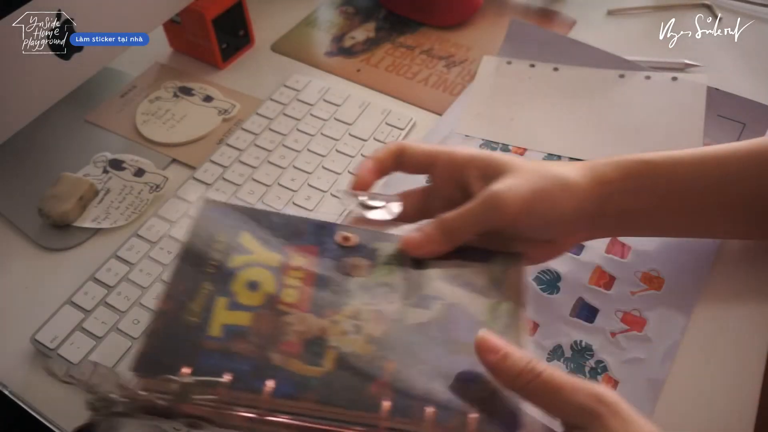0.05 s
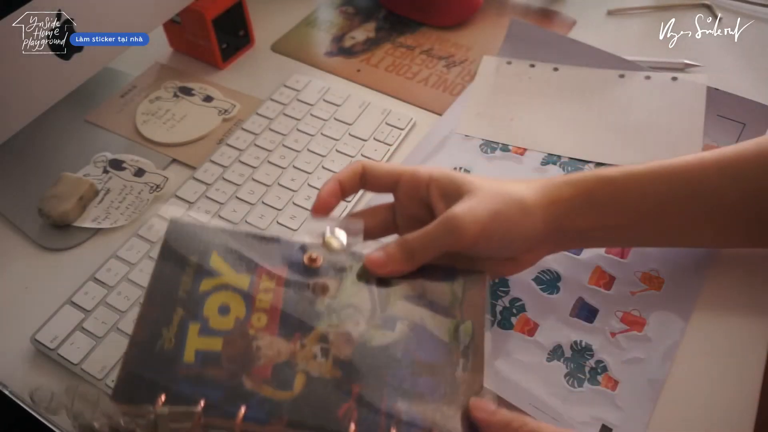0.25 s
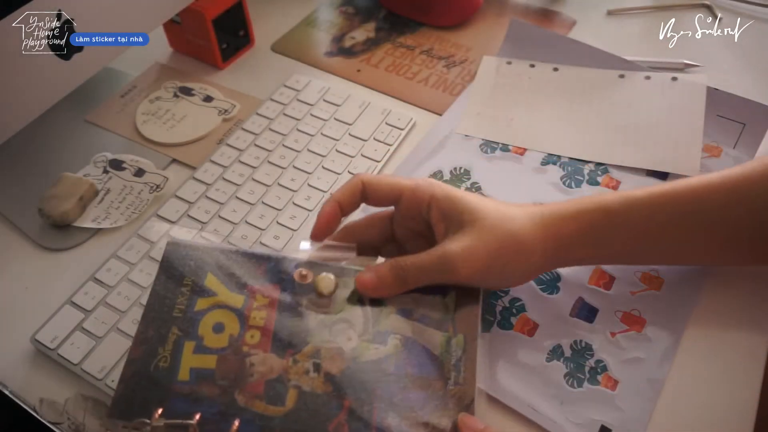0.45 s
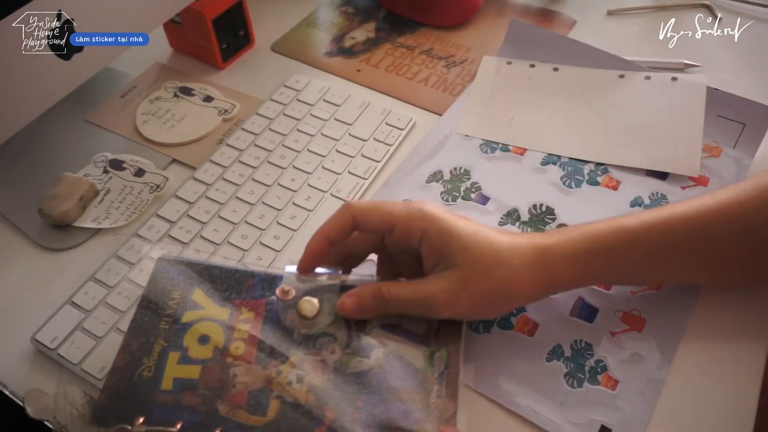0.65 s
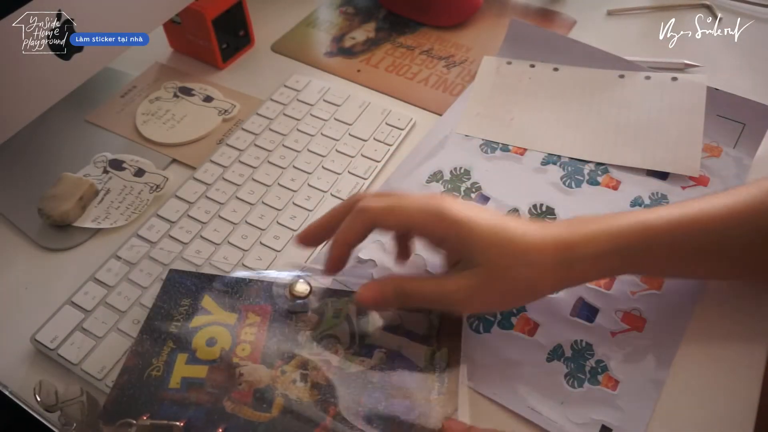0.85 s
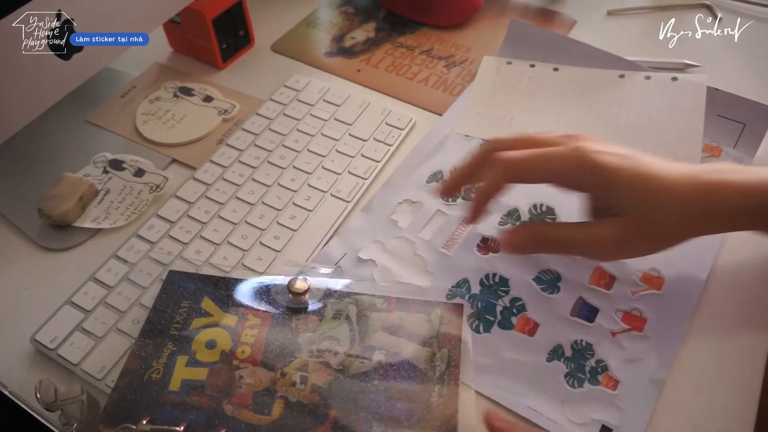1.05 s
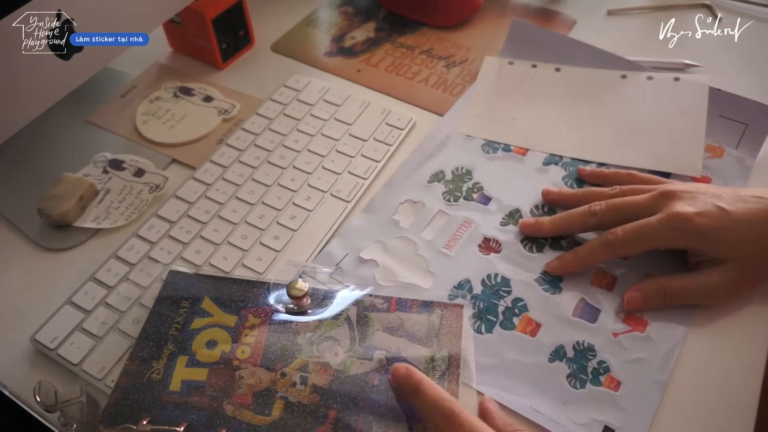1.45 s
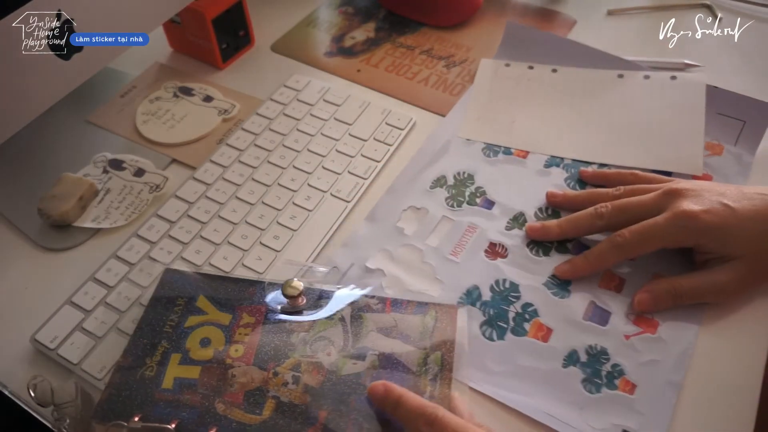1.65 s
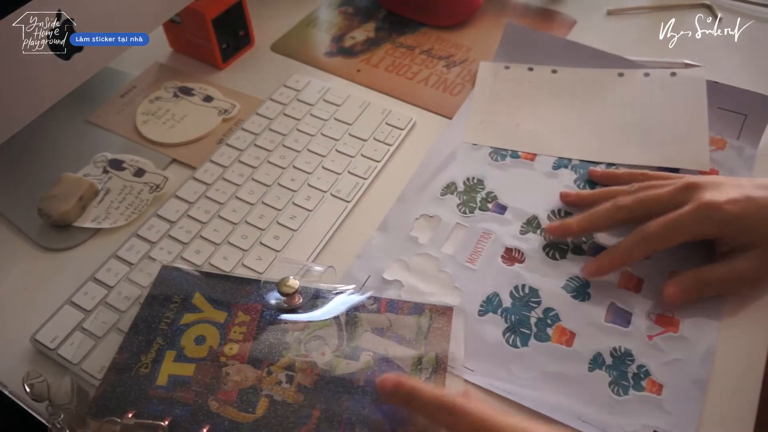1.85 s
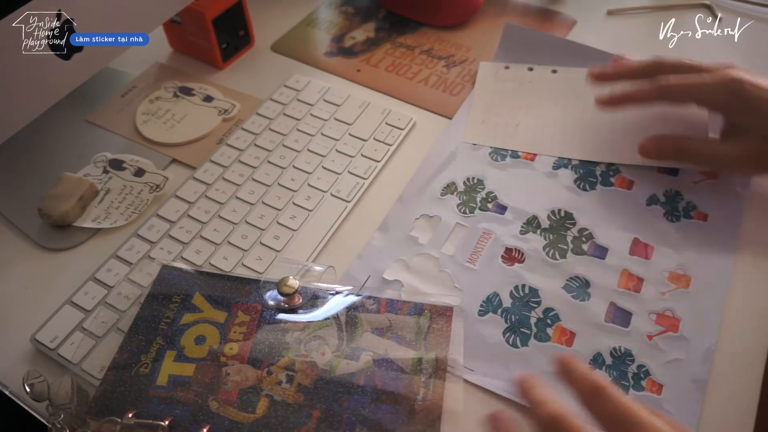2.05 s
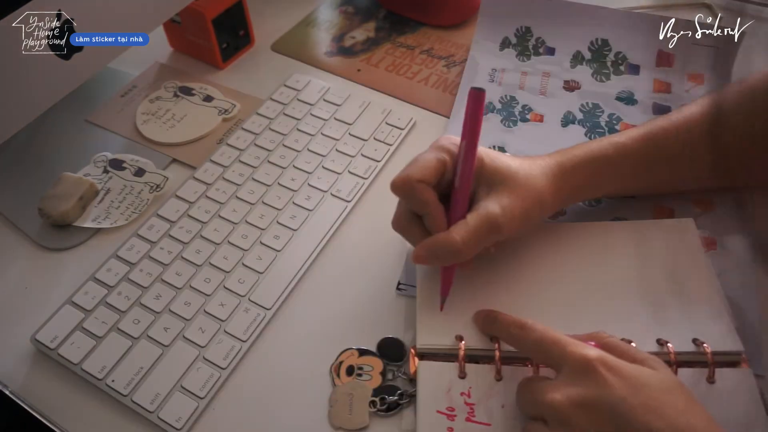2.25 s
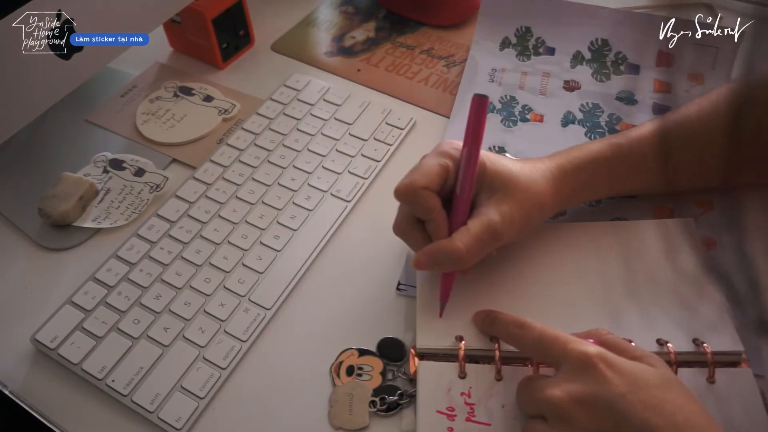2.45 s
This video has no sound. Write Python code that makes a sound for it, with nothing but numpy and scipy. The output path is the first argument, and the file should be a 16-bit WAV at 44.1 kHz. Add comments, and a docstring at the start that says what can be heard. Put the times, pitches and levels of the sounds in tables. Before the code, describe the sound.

A stiff plastic pouch crackles and snaps onto a desk, then hands brush over paper.

```python
"""Over the steady noise of a small, bright room, a stiff plastic pouch is laid on a desk.
Its edge knocks down, its flap snaps, and the buckling film crackles, with faint thuds from the desk.
Near 0.8 s fingers let go of the metal stud with two clicks; the pouch skids and settles.
Then fingertips wipe a glossy sticker sheet, a few faint ticks sound, and a palm glides over paper,
ending in one brighter brush at about 2.2 s."""
import sys
import numpy as np
from scipy import signal
from scipy.fft import rfft, irfft, next_fast_len
from scipy.io import wavfile

SR = 44100
rng = np.random.default_rng(int(sys.argv[2]) if len(sys.argv) > 2 else 0)


def unload_audio(sound):
    """Save the sound as a 16-bit wav file, at the path given as the first command line argument."""
    columns = np.transpose(np.atleast_2d(sound))
    # keep every value between -1 and 1, then stretch to whole-number steps
    steps = np.round(np.clip(columns, -1, 1) * 32767)
    wavfile.write(sys.argv[1], SR, steps.astype(np.int16))


N = 110250

# fine, bright crackle of the film (frequency [Hz], level [dB])
CRACKLE_SPECTRUM = [(300, -38), (1500, -13), (4000, -26), (6000, -11), (7700, 0), (9000, -4.5), (11000, -5)]
FINGER_PAN_DB = -5  # every pan is left minus right


def amp(db):
    """Decibels to gain."""
    return 10 ** (np.asarray(db) / 20)


def unit(x):
    """Scale to rms 1."""
    return x / np.sqrt(np.mean(x ** 2) + 1e-20)


def along(points, hz):
    """Read a curve of (frequency [Hz], value) points on a log frequency axis."""
    freqs, values = np.transpose(points)
    return np.interp(np.log(hz + 1), np.log(freqs + 1), values)


def pan(db):
    """Left and right gains for a level difference."""
    return amp(np.array([[.5], [-.5]]) * db)


def filtered(x, response):
    """Shape x with a frequency response."""
    n = x.shape[-1]
    size = next_fast_len(n + 4096)
    return irfft(rfft(x, size) * response(np.fft.rfftfreq(size, 1 / SR)), size)[..., :n]


def stereo(pair, spectrum=((1, 0), (2, 0))):
    """Colour and blend two unrelated noises: narrow in the bass, wide in the treble."""
    # stereo image (frequency [Hz], left-right correlation)
    likeness = [(60, 0.92), (500, 0.91), (1200, 0.74), (2500, 0.12), (10000, 0.1)]

    def response(hz):
        angle = np.arccos(along(likeness, hz)) / 2
        return amp(along(spectrum, hz)) * [np.cos(angle), np.sin(angle)]
    mid, side = filtered(pair, response)
    return unit(np.array([mid + side, mid - side]))


def add(out, start, x):
    """Mix x in at start seconds."""
    i = max(0, round(start * SR))
    out[:, i:i + x.shape[1]] += x[:, :N - i]


def swell(start, rise, hold, fall, db):
    """Envelope of one stroke: it climbs 21 dB over rise, holds, and drops 21 dB per fall."""
    t = np.arange(N) / SR - start
    below_peak = np.maximum(0, 1 - t / rise) + np.maximum(0, (t - rise - hold) / fall)
    return amp(db - 21 * below_peak)


def room_response():
    """The walls' answer to a click: a short tail that dies fastest in the high treble."""
    # reverb time (frequency [Hz], t60 [s])
    decay = [(150, 0.16), (800, 0.38), (2500, 0.33), (5000, 0.3), (11000, 0.084)]
    hz, t, bands = signal.stft(stereo(rng.standard_normal((2, SR // 2))), SR, nperseg=256)
    tail = signal.istft(bands * amp(-60 * t / along(decay, hz)[:, None]), SR, nperseg=256)[1]
    predelay = round(.008 * SR)
    return np.pad(tail / np.linalg.norm(tail[0]), ((0, 0), (predelay, 0)))


def friction(strokes, spectrum, slips_per_s, slip_db, pan_db=FINGER_PAN_DB):
    """Hiss and tiny random slips, swelling with each stroke."""
    envelope = sum(swell(*stroke) for stroke in strokes)
    slips = unit((rng.random(N) < slips_per_s / SR) * rng.standard_normal((2, N)))
    texture = rng.standard_normal((2, N)) + amp(slip_db) * slips
    return pan(pan_db) * envelope * stereo(texture, spectrum)


def impacts(contacts, modes, spectrum, crack_db, crack_t60, wet_db, low_cut_hz):
    """Each contact rings damped modes with a short crack; a soft contact is duller."""
    # added pan that leans the treble to the right (frequency [Hz], pan [dB])
    lean = [(200, -1.5), (630, 0), (1150, -2.5), (2000, -6), (3600, -5.5), (7000, -9)]
    out, t = np.zeros((2, N)), np.arange(SR // 10) / SR
    attack = 1 - np.exp(-t / 0.00013)
    for start, db, bright_hz, pitch, pan_db, sustain in contacts:
        ring = np.zeros_like(t)
        for k, (hz, mode_db, t60) in enumerate(modes):
            decay = amp(mode_db + rng.normal(0, 2.53) - 60 * t / (t60 * sustain))
            ring += (-1) ** k * decay * np.sin(2 * np.pi * hz * pitch * t)
        crack = amp(crack_db - 60 * t / crack_t60) * stereo(rng.standard_normal((2, len(t))), spectrum)
        softness = signal.butter(2, bright_hz, fs=SR)
        hit = amp(db) / 2 * signal.lfilter(*softness, (ring + crack) * attack)
        reverb = signal.fftconvolve(hit, room_response(), axes=1)
        add(out, start, pan(pan_db) * hit)
        add(out, start, pan(pan_db / 2) * amp(wet_db) * reverb)
    # the hits carry almost no bass
    out = signal.lfilter(*signal.butter(2, low_cut_hz, 'high', fs=SR), out)
    return filtered(out, lambda hz: pan(along(lean, hz)))


def room_tone():
    """Steady room noise with the faint, unsteady hum of an appliance."""
    # colour of the air (frequency [Hz], level [dB])
    spectrum = [(25, -32), (60, -34), (110, -23.5), (200, -19.5), (270, -16), (330, -11), (470, -8),
                (700, -4.5), (1250, 0), (1900, -2), (2850, -8.5), (3700, -18.5), (8000, -20),
                (11000, -30.5)]
    # its treble sits to the right (frequency [Hz], pan [dB])
    lean = [(100, 0.5), (450, -0.5), (1200, -3), (3000, -5.5), (9000, -8)]
    air = filtered(stereo(rng.standard_normal((2, N)), spectrum), lambda hz: pan(along(lean, hz)))
    drift = np.cumsum(rng.normal(0, 0.024, N))
    hum = np.sin(2 * np.pi * 414 * np.arange(N) / SR + drift)
    return amp(-51.5) * air + amp(-69) * hum


def palm_glides():
    """A palm glides over the sheets with a dull hush."""
    # slow hand moves (time [s], rise [s], hold [s], fall [s], level [dB])
    glides = [(-.02, 0.0097, 0.011, 0.28, -49.5), (1.35, 0.21, 0.06, 0.38, -55.5),
              (1.75, 0.326, 0.16, 0.066, -55.5)]
    # palm on paper (frequency [Hz], level [dB])
    spectrum = [(60, -31), (200, -23), (600, -2.5), (1200, 4), (2400, -8), (4000, -16), (11000, -41)]
    return friction(glides, spectrum, slips_per_s=608, slip_db=-6, pan_db=-2)


def sticker_wipes():
    """Fingertips smooth the glossy sticker sheet: a thin, high hiss."""
    # light wipes (time [s], rise [s], hold [s], fall [s], level [dB])
    wipes = [(1.15, 0.046, 0.054, 0.29, -65), (1.48, 0.2, 0.06, 0.26, -54.5)]
    # skin on gloss (frequency [Hz], level [dB])
    spectrum = [(300, -33), (1500, -9), (3500, 1.5), (5500, -2.5), (7600, 3), (9500, 5), (11000, -5)]
    return friction(wipes, spectrum, slips_per_s=800, slip_db=-6)


def paper_brush():
    """A hand brushes quickly and brightly over paper."""
    # overlapping strokes (time [s], rise [s], hold [s], fall [s], level [dB])
    strokes = [(2.158, 0.045, 0.062, 0.0068, -43.5), (2.175, .03, 0.0044, 0.027, -51)]
    # paper hiss (frequency [Hz], level [dB])
    spectrum = [(80, -36), (300, -17), (1400, -9), (2500, -6), (3550, 2), (4200, 0), (5050, 6),
                (6000, -2.5), (7800, 2), (9500, 0), (11000, -3)]
    return friction(strokes, spectrum, slips_per_s=1450, slip_db=-5, pan_db=-8)


def finger_rubs():
    """Fingers slide on the plastic and on the sticker sheet."""
    # short rubs (time [s], rise [s], hold [s], fall [s], level [dB])
    rubs = [(-.01, 0.0049, 0.0083, 0.12, -46), (.772, 0.003, 0.024, 0.13, -44),
            (1.555, 0.0085, 0.013, 0.11, -52)]
    # skin on film (frequency [Hz], level [dB])
    spectrum = [(300, -35), (1500, -12), (3500, -3), (5500, -4), (7600, 7), (9000, -1.5), (11000, -3)]
    return friction(rubs, spectrum, slips_per_s=806, slip_db=-8)


def skin_squeak():
    """Skin catches on the film: a thin, brief whistle with a trace of reverb."""
    drift = np.cumsum(rng.normal(0, .03, N))
    envelope = swell(start=.235, rise=.004, hold=.005, fall=.012, db=-40)
    tone = envelope * np.sin(2 * np.pi * 7570 * np.arange(N) / SR + drift)
    reverb = signal.fftconvolve(tone[None], room_response(), axes=1)[:, :N]
    return pan(FINGER_PAN_DB) * (tone + amp(-17) * reverb)


def desk_thuds():
    """The pouch's weight thuds faintly into the desk under the heaviest knocks."""
    # landings (time [s], level [dB])
    thuds = [(.305, -64), (.35, -68), (.469, -77)]
    # dull desk top (frequency [Hz], level [dB])
    spectrum = [(25, -3), (70, 2), (150, -3), (400, -12), (1500, -50)]
    t, attack_s, t60 = np.arange(N) / SR, 0.0036, 0.1
    envelope = sum(amp(db - 60 * np.abs(t - start) / t60) * np.clip((t - start) / attack_s, 0, 1)
                   for start, db in thuds)
    return envelope * stereo(rng.standard_normal((2, N)), spectrum)


def pouch_skid():
    """The pouch skids on the desk just before it settles."""
    # one slide (time [s], rise [s], hold [s], fall [s], level [dB])
    skids = [(.885, 0.036, 0.0087, 0.062, -48.5)]
    # plastic on the desk (frequency [Hz], level [dB])
    spectrum = [(100, -31), (1000, -6), (3500, -6), (5000, -1), (6000, 2.5), (7200, -8), (9000, -15),
                (11000, -21)]
    return friction(skids, spectrum, slips_per_s=680, slip_db=0)


def film_crackle():
    """The film crackles finely as it is pinched and as it relaxes."""
    # pinch and release (time [s], rise [s], hold [s], fall [s], level [dB])
    flexes = [(.232, 0.0071, 0.046, 0.082, -50), (.49, 0.018, 0.017, 0.1, -53.5)]
    return friction(flexes, CRACKLE_SPECTRUM, slips_per_s=300, slip_db=0)


def crease_pops():
    """Single creases of the pinched film let go, each with a tiny, bright burst."""
    # creases popping (time [s], level [dB])
    pops = [(.2535, -35.5), (.2662, -41), (.273, -42)]
    t, t60 = np.arange(N) / SR, 0.016
    envelope = sum(amp(db - 60 * np.abs(t - start) / t60) * (t >= start) for start, db in pops)
    return pan(FINGER_PAN_DB) * envelope * stereo(rng.standard_normal((2, N)), CRACKLE_SPECTRUM)


def film_crinkle():
    """The film buckles in a dense crinkle as the pouch lies down."""
    # one crumple (time [s], rise [s], hold [s], fall [s], level [dB])
    crinkles = [(.307, 0.0064, 0.13, 0.096, -35)]
    # buckling film (frequency [Hz], level [dB])
    spectrum = [(100, -48), (450, -36), (750, -22), (1500, -1), (2400, 2), (3200, 2.5), (4000, -5),
                (5200, -14), (7500, -20.5), (9200, -13), (11000, -18)]
    return friction(crinkles, spectrum, slips_per_s=900, slip_db=0, pan_db=-3)


def stud_clicks():
    """Light clicks of the metal stud and fingernails: a hard tick with a very short ring."""
    # contacts (time [s], level [dB], brightness [Hz], pan [dB])
    clicks = [(0.781, -32.5, 4000, -14), (0.7867, -12.5, 13300, 3.5), (.868, -21.5, 10100, 2.5),
              (1.573, -39, 12000, 1), (1.8209, -43, 12000, -20), (1.8373, -39, 10000, -3)]
    # ring of the stud (frequency [Hz], level [dB], t60 [s])
    modes = [(1074, -3.5, 0.0094), (2290, -11.5, 0.011), (4710, -3, 0.008), (5460, -9, 0.0041),
             (6750, -7, 0.0051), (7250, -4, 0.0035)]
    # noise of the tick (frequency [Hz], level [dB])
    spectrum = [(100, -40), (550, -9), (1100, -7), (1600, -1), (2500, 0), (3900, -13), (4850, 5),
                (6000, -0.5), (7200, -2), (11000, -3)]
    contacts = [(start, db, bright_hz, 1, pan_db, 1) for start, db, bright_hz, pan_db in clicks]
    return impacts(contacts, modes, spectrum, crack_db=-1, crack_t60=0.018, wet_db=-10, low_cut_hz=390)


def pouch_knocks():
    """The stiff pouch knocks and snaps; the fingers shorten its ring until they let go."""
    # edge and flap hits (time [s], level [dB], brightness [Hz], pitch [ratio], pan [dB])
    knocks = [(.106, -34.5, 1950, 1, 8), (.154, -37.5, 6000, 1.1, 0), (.2243, -13.5, 980, 0.92, 5),
              (0.2275, -21.5, 900, 0.686, 2), (.267, -33.5, 4000, 0.69, 8), (.3041, -8, 4460, 1.003, 1),
              (.3494, -8.5, 5300, 1.016, 0), (.3523, -17.5, 5660, 1.01, 4), (0.3826, -16.5, 6060, 1.012, 1),
              (.409, -16.5, 5740, 0.99, 5), (.424, -17.5, 5500, 1.05, 5), (0.4357, -20, 5200, 1, 4),
              (0.444, -24, 4900, 1.05, 0), (.4512, -20, 4420, 1, -3), (.4683, -11.5, 2820, .97, 12),
              (0.4744, -14.5, 2330, 1.028, -3.5), (0.4774, -16, 2170, 0.84, 3),
              (.783, -29.5, 3500, 0.95, 0), (.806, -18, 2330, 1, 6), (.815, -26, 1210, 0.98, 4),
              (.9392, -19, 2220, 1.02, 5), (.943, -22.5, 1510, 1.01, 5)]
    # free ring of the pouch on the desk (frequency [Hz], level [dB], t60 [s])
    modes = [(755, -12.5, 0.057), (1208, -7.5, 0.029), (1564, -9, 0.018), (1888, -10.5, 0.031),
             (2443, -3, 0.013), (2970, -8, 0.024), (3460, -14.5, 0.011), (4700, -12, 0.025)]
    # crack of the plastic (frequency [Hz], level [dB])
    spectrum = [(200, -14.5), (420, -15), (750, -38), (2600, -3), (4200, -6), (6500, -6), (8500, -10),
                (11000, -6.5)]
    release_s, held_sustain = 0.88, 0.69
    contacts = [(start, *blow, held_sustain if start < release_s else 1) for start, *blow in knocks]
    return impacts(contacts, modes, spectrum, crack_db=-2.5, crack_t60=.035, wet_db=-4, low_cut_hz=514)


def scene():
    """Pouch, stud and hands over the room tone."""
    pouch = pouch_knocks() + stud_clicks() + pouch_skid() + desk_thuds()
    film = film_crinkle() + film_crackle() + crease_pops()
    hands = finger_rubs() + skin_squeak() + sticker_wipes() + paper_brush() + palm_glides()
    return pouch + film + hands + room_tone()


def record(dry):
    """Two closely spaced microphones, the left reached first, with a steep treble cut."""
    left_lead_s, top_hz = 3.5e-5, 11060
    pair = filtered(dry, lambda hz: np.exp(1j * np.pi * hz * left_lead_s * np.array([[1], [-1]])))
    return filtered(pair, lambda hz: 1 / np.sqrt(1 + (hz / top_hz) ** 160))


dry = scene()
out = record(dry)
unload_audio(out)
```